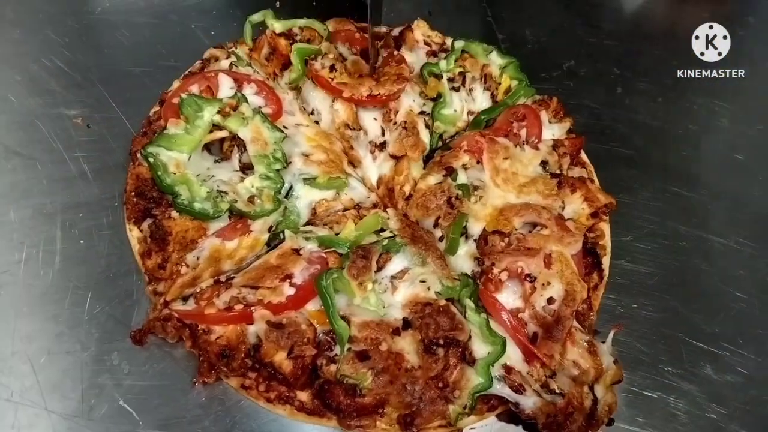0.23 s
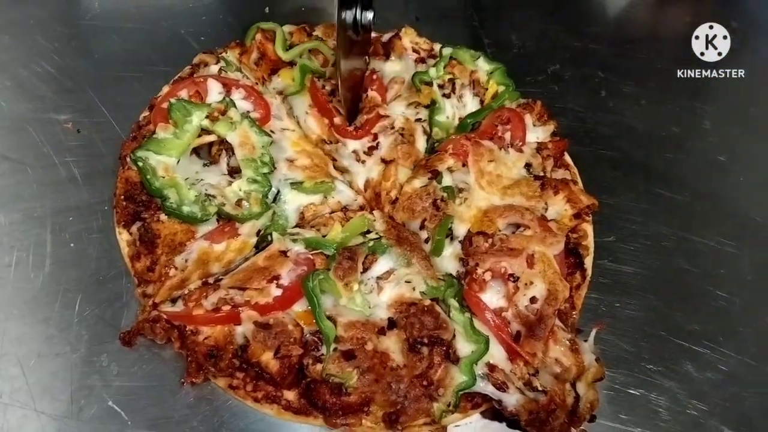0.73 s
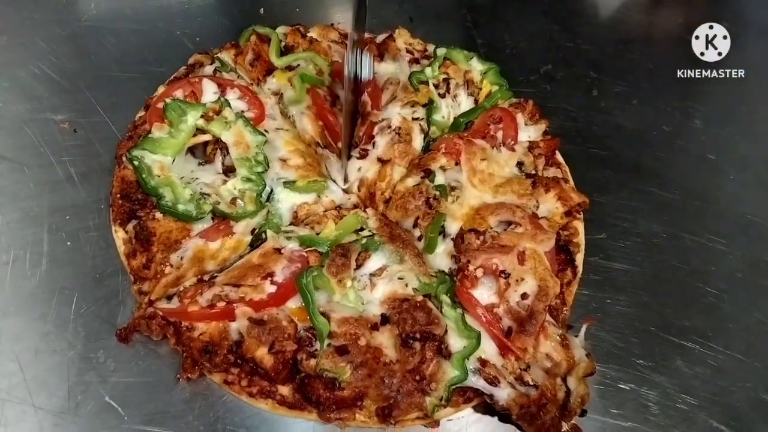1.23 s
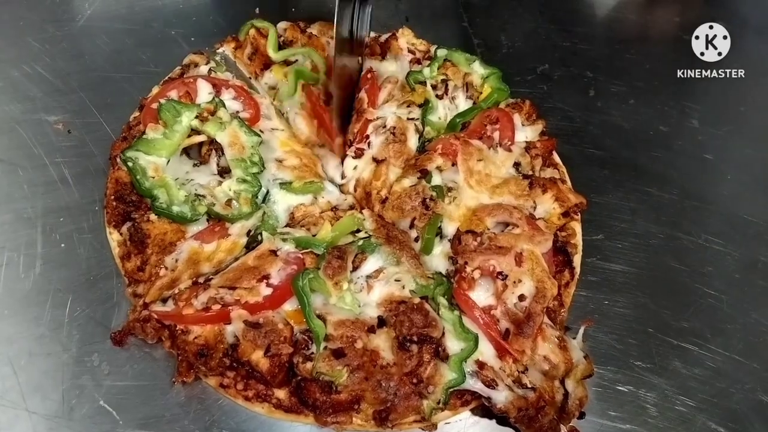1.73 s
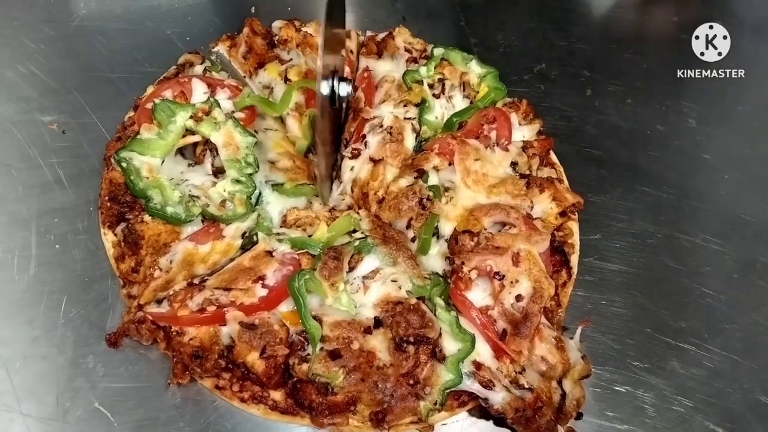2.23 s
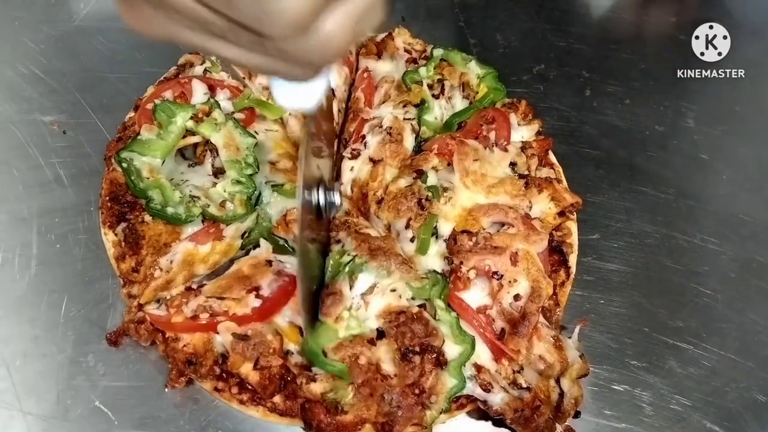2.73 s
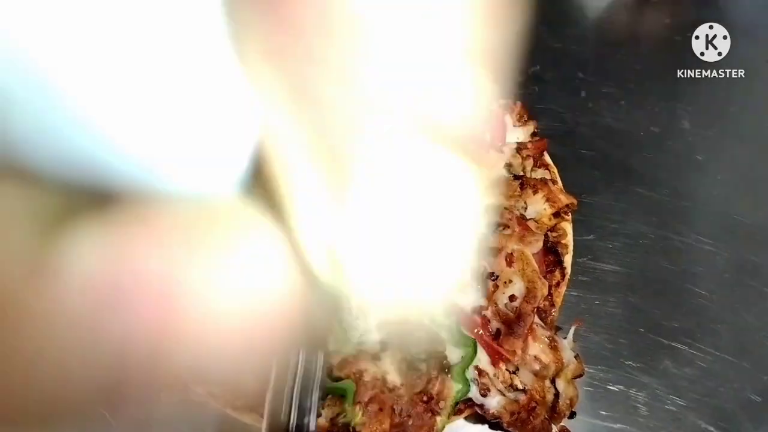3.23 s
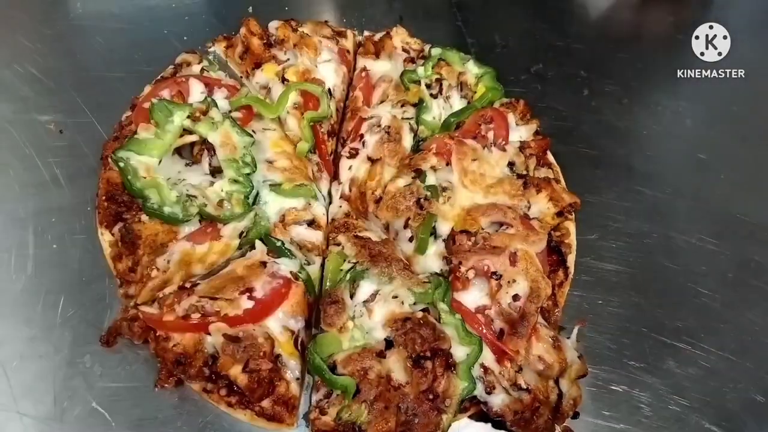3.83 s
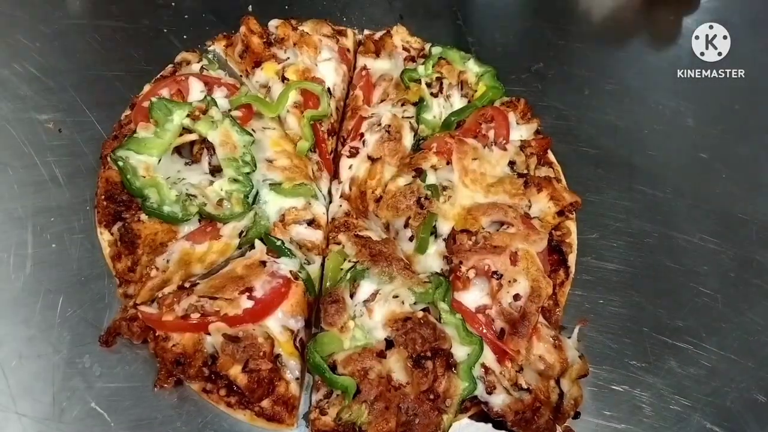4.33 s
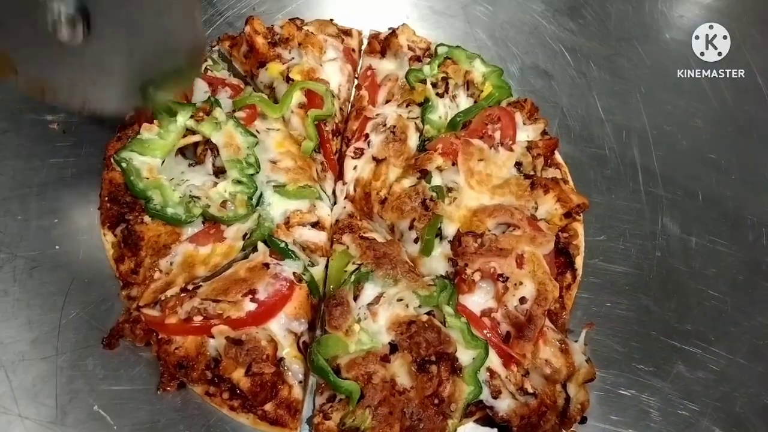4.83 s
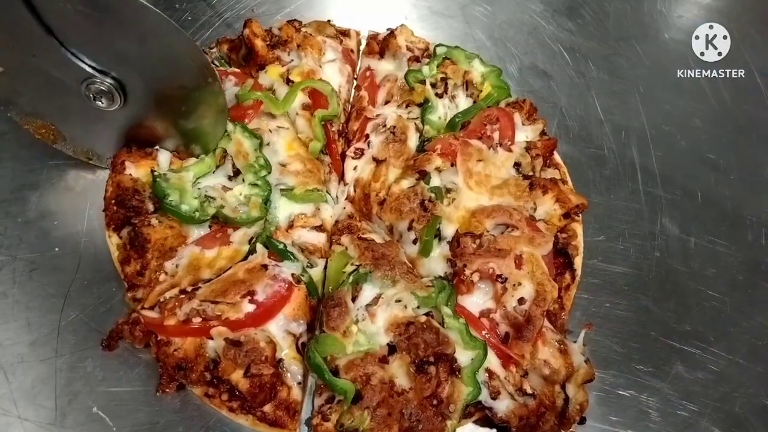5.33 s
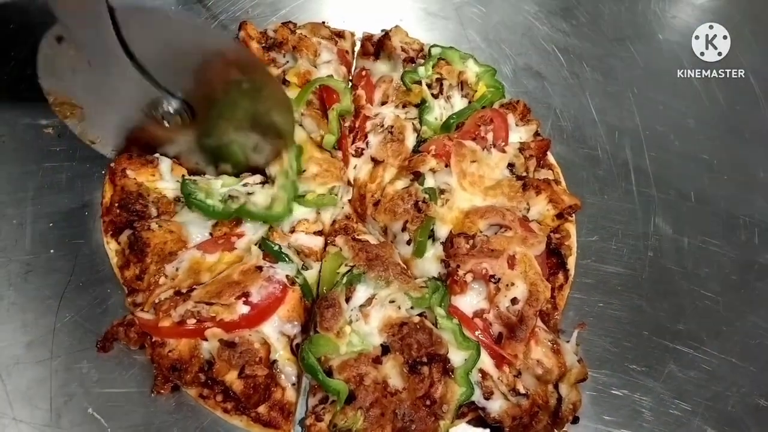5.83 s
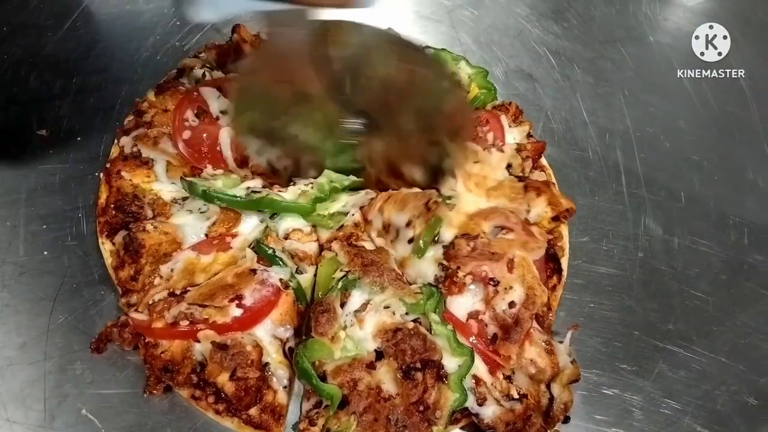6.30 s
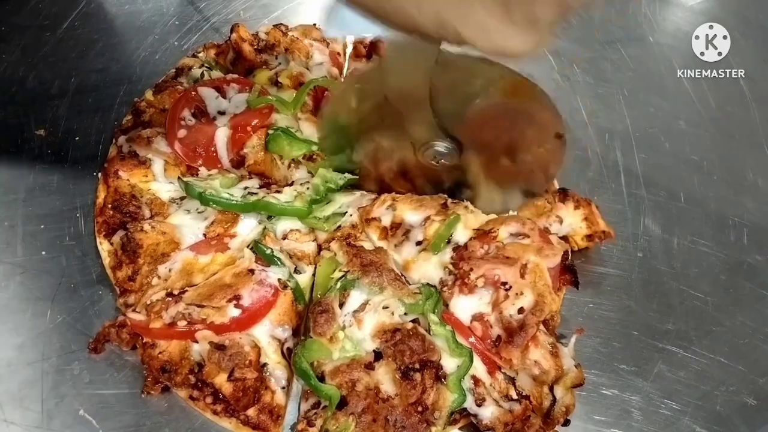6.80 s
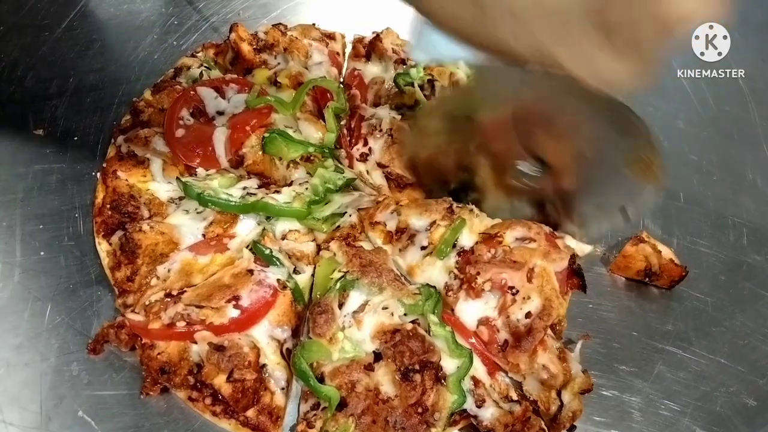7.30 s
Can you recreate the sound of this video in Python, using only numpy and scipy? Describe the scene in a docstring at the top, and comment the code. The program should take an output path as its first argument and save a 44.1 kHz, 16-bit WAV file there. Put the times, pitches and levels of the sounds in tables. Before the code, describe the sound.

Crackling crust, sharp snaps and dull metallic thuds as a pizza wheel is pushed across a steel counter, with hum fading midway.

```python
"""Hard-walled kitchen: a wheel cutter is pushed through a crisp pizza crust on a steel top.
Shaped noise grains make the thud, scrape and crackle of each push; short decaying tones make the snaps.
Blows into panel modes make the knocks, decaying sines the wheel's ring, narrow noise the short tones.
A soft hiss passes and a mains hum wavers below, with a rough low ring and a thin whine above it.
A phone's noise suppressor pulls down the kitchen air between the sounds."""
import sys
import numpy as np
from scipy import signal
from scipy.io import wavfile
from scipy.ndimage import uniform_filter1d

SR = 44100
rng = np.random.default_rng(int(sys.argv[2]) if len(sys.argv) > 2 else 0)


def persist_wave(psi):
    """Save psi, clipped to +-1, as 16-bit WAV."""
    counts = np.round(np.clip(psi, -1, 1) * 32767).astype(np.int16)
    wavfile.write(sys.argv[1], SR, np.atleast_2d(counts).T)


N = 333377
T = np.arange(N) / SR
HUM_HZ = 100.6

# dull colour of the steel top: [freq_hz, relative_db_per_hz]
THUD_SPECTRUM = [(30, -44.5), (60, -23.5), (90, -9.5), (125, -6.5), (160, -4.5), (200, -1.5), (450, -6),
                 (900, -13), (1200, -26), (2000, -91.5)]
# hard colour of wheel on steel: [freq_hz, relative_db_per_hz]
SCRAPE_SPECTRUM = [(350, -28.5), (600, -13.5), (1050, -2), (1430, -2), (1550, -3.5), (2270, -12.5),
                   (2480, -12), (5000, -27.5), (6500, -58), (11000, -120)]
# colour of breaking crust: [freq_hz, relative_db_per_hz]
CRUST_SPECTRUM = [(1470, -25), (2500, -13), (2940, -2.5), (3560, 1.5), (4480, -7), (5590, -3), (6320, -3.5),
                  (7420, -2.5), (10000, -8.5), (13800, -5.5), (15600, -14.5)]


def amp(db):
    """Decibels to amplitude."""
    return 10 ** (np.asarray(db) / 20)


def unit_rms(x):
    """Scale to RMS 1."""
    return x / np.sqrt(np.mean(x ** 2) + 1e-20)


def read(points, hz):
    """Interpolate a table over log frequency."""
    f, value = np.transpose(points)
    return np.interp(np.log(hz + 1), np.log(f + 1), value)


def curve(points):
    """Interpolate a (time, level) table over the whole scene."""
    time_s, level_db = np.transpose(points)
    return np.interp(T, time_s, level_db)


def add(mix, start_s, sound):
    """Add a sound into the mix in place, cut at the end."""
    part = mix[round(start_s * SR):][:len(sound)]
    part += sound[:len(part)]


def colour(x, spectrum):
    """Causal filter of unit energy: the phase follows from the log gain."""
    hz = abs(np.fft.fftfreq(4096, 1 / SR))
    log_gain = np.log(amp(np.maximum(read(spectrum, hz), -100)))
    min_phase = np.exp(np.conj(signal.hilbert(log_gain)))
    taps = np.fft.ifft(min_phase).real[:2048]
    return signal.oaconvolve(x, taps / np.linalg.norm(taps))[:len(x)]


def resonate(x, hz, width_hz):
    """One resonance of gain 1 at its centre: shift down, one-pole low-pass, shift back."""
    turn = np.exp(2j * np.pi * hz * np.arange(len(x)) / SR)
    r = np.exp(-np.pi * width_hz / SR)
    return 2 * (turn * signal.lfilter([1 - r], [1, -r], x / turn)).real


def grains(per_s, spread_db, noise_level):
    """Random clicks of very uneven size over continuous noise, at RMS 1."""
    size = amp(spread_db * np.minimum(rng.exponential(1, N), 4))
    signed = size * rng.choice([-1., 1.], N)
    clicks = unit_rms(signed * (rng.random(N) < per_s / SR))
    return unit_rms(clicks + noise_level * rng.standard_normal(N))


def patchy(x, depth_db):
    """Narrow bands swell and fade at random for some 50 ms, as a noise suppressor leaves them."""
    z = signal.stft(x, nperseg=512, noverlap=384)[2]
    patches = uniform_filter1d(rng.standard_normal(z.shape), size=3, axis=0)
    patches = uniform_filter1d(patches, size=16, axis=1)
    gain = amp(depth_db * unit_rms(patches))
    return signal.istft(z * gain, nperseg=512, noverlap=384)[1][:N]


def effort_db():
    """Each push swells, then dies away: thud, scrape and crackle levels, summed in power."""
    # pushes of the wheel into the crust; fall_s is for 30 dB at speed 1:
    # [start_s, swell_s, fall_s, thud_db, scrape_db, crackle_db]
    push_table = [(0.0, 0.003, .18, -50, -50, -63), (.21, .04, .25, -82, -69, -62),
                  (.52, .03, 0.5, -78, -68.5, -66), (.7, .025, 0.02, -75, -68, -85),
                  (.78, .05, 0.34, -58.5, -62, -62), (.955, .07, .12, -39, -42, -53),
                  (1.045, 0.013, .3, -44.5, -45, -42.5), (1.39, 0.066, .23, -37, -47.5, -52),
                  (1.62, .03, .5, -70, -70.5, -68), (1.7, .04, 0.35, -72, -72.5, -65),
                  (1.79, .02, 0.22, -72, -72, -62), (1.88, .008, 0.07, -63, -52, -58),
                  (2.245, .014, 0.65, -66.5, -72, -64), (2.3, .04, 0.2, -62, -70.5, -70),
                  (2.48, .02, 0.1, -70.5, -76, -69.5), (2.565, 0.013, 0.66, -53, -67.5, -63.5),
                  (2.6, 0.046, 0.1, -55, -58.5, -62.5), (2.665, 0.018, 0, -53.5, -55, -63),
                  (2.778, 0.0078, 0.1351, -37.5, -47.5, -50.5), (2.876, .022, .17, -28, -49, -40),
                  (2.92, 0.024, 0.3178, -36.5, -42.5, -57.5), (3.283, 0.011, 0.12, -51.5, -47.5, -56.5),
                  (3.31, .01, 0.28, -60, -60.5, -78), (3.93, 0.074, .6, -65, -71, -61),
                  (4.676, 0.018, 0.1152, -19.5, -24.5, -33.5), (4.71, .045, 0.3614, -27.5, -26.5, -30),
                  (5.23, .04, .5, -78, -69, -62.5), (5.33, .03, 0.54, -72, -74.5, -63),
                  (5.42, .06, 0.4, -70, -80, -72), (5.6, .035, 0.23, -85, -90, -63),
                  (5.88, .012, 0.43, -72.5, -72, -57.5), (5.9, .03, 0.22, -56, -68.5, -65.5),
                  (6.19, .015, 0.76, -68, -85, -65), (6.22, .045, 0.24, -61.5, -76, -57),
                  (6.42, .02, 0.14, -68, -85, -64), (6.526, .012, .2, -46, -59, -54),
                  (6.56, .04, 0.05, -52.5, -51.5, -54), (6.66, .03, 0.2, -65.5, -75.5, -62.5),
                  (6.785, .05, 0.19, -53.5, -44, -48.5), (6.85, 0.038, 0.14, -56.5, -55.5, -74),
                  (6.99, .055, 0.19, -44.5, -40.5, -43.5), (7.06, .04, 0.32, -49, -56, -66),
                  (7.25, .17, 0.3, -72.5, -58, -61)]
    onset_db = 24.5  # below the top, where a push sets in
    fall_speed = np.array([1.07, 0.96, 1.435])  # thud, scrape, crackle
    power, t = np.full((N, 3), 1e-12), T[:SR, None]
    for start_s, swell_s, fall_s, *top_db in push_table:
        rise_db = onset_db * (t / swell_s - 1)
        fall_db = -30 * fall_speed * (t - swell_s) / fall_s
        add(power, start_s, amp(2 * (top_db + np.minimum(rise_db, fall_db))))
    return 10 * np.log10(power.T)


def steel(body):
    """The panel modes of the steel top stand out of a broad colour."""
    # panel modes: [freq_hz, width_hz, gain_db]
    panel_modes = [(205, 30, 0), (287, 14, 2), (430, 16, 2), (608, 18, 2), (822, 20, -2), (1225, 35, -3),
                   (1420, 70, -5), (1900, 45, -3), (2290, 45, -3)]
    return body + sum(amp(db) * resonate(body, hz, width_hz) for hz, width_hz, db in panel_modes)


def rumble(thud_db, scrape_db):
    """Many small slips of the wheel shake the steel: a dull thud and a harder scrape."""
    thud = colour(grains(per_s=300, spread_db=1.5, noise_level=0.8), THUD_SPECTRUM)
    scrape = colour(grains(per_s=800, spread_db=7.0, noise_level=0.84), SCRAPE_SPECTRUM)
    return steel(patchy(amp(thud_db) * thud + amp(scrape_db) * scrape, depth_db=2.6))


def crackle(level_db):
    """Dense tiny fractures of the crust; harder pressure adds ever more of the finest sizzle."""
    # finest fractures: [freq_hz, relative_db_per_hz]
    sizzle_spectrum = [(8000, -39.5), (11000, -7.5), (12500, -2), (15600, 0)]
    small_snaps_per_s, small_snap_db = 41, 8  # chance snaps, size re crackle
    breaks = grains(per_s=1100, spread_db=3.5, noise_level=1.1)
    hits = rng.standard_normal(N) * (rng.random(N) < small_snaps_per_s / SR)
    burst = np.exp(-np.arange(200) / 30) * rng.standard_normal(200)
    small = signal.oaconvolve(amp(small_snap_db) * hits, burst)[:N]
    sizzle = amp(level_db - 4.5 + 0.48 * (level_db + 58.5)) * breaks
    body = colour(amp(level_db) * (breaks + small), CRUST_SPECTRUM)
    return patchy(body + colour(sizzle, sizzle_spectrum), depth_db=2.5)


def kitchen_air():
    """Steady noise of the room, strongest in the low mids."""
    # room air: [freq_hz, relative_db_per_hz]
    air_spectrum = [(20, -4.5), (60, -14), (150, -5.5), (300, 6), (600, -3), (1200, -7.5), (2000, -14.5),
                    (3200, -22), (4500, -24), (7500, -24), (11000, -22.5), (15600, -38)]
    return amp(-61.5) * colour(rng.standard_normal(N), air_spectrum)


def hum():
    """A steady mains line with weak noise around it, so that it wavers."""
    # line level, fading after the loud knock: [time_s, level_db]
    hum_level = [(0, -51), (4.7, -50.5), (5.1, -53), (5.2, -65.5), (7.56, -71.5)]
    # noise that fades with the hum: [freq_hz, relative_db_per_hz]
    hum_noise_spectrum = [(20, -26.5), (60, -18), (80, -4.5), (125, -2), (160, -4), (200, -26.5),
                          (400, -72.5)]
    line = np.sqrt(2) * np.sin(2 * np.pi * HUM_HZ * T)
    near = resonate(resonate(rng.standard_normal(N), HUM_HZ, 9), HUM_HZ, 9)
    noise = colour(rng.standard_normal(N), hum_noise_spectrum)
    return amp(curve(hum_level)) * (line + 0.3 * unit_rms(near) + 0.29 * noise)


def low_ring():
    """A rough tone near 300 Hz, like the tray ringing, comes and goes: a sine in narrow noise."""
    # sine peak level: [time_s, level_db]
    ring_level = [(0, -57), (.4, -69.5), (3.85, -70), (4.01, -53.5), (4.3, -65), (4.55, -67), (4.63, -57.5),
                  (5.42, -66.5), (5.48, -53.5), (5.6, -68), (6.1, -68), (6.16, -59.5), (6.5, -62),
                  (6.78, -62), (6.85, -53), (7.3, -49.5), (7.56, -56)]
    near = resonate(resonate(rng.standard_normal(N), 303, 40), 303, 40)
    tone = np.sin(6 * np.pi * HUM_HZ * T) + 0.75 * unit_rms(near)
    return amp(curve(ring_level)) * tone


def whine():
    """A thin high sine, switched on for three spans."""
    # whine spans: [start_s, end_s, peak_db]
    whine_spans = [(0, .9, -87), (1.93, 2.17, -80), (4.38, 4.68, -90)]
    whine_hz = 9044
    level = sum(amp(db) * (T > start_s) * (T < end_s) for start_s, end_s, db in whine_spans)
    return level * np.sin(2 * np.pi * whine_hz * T)


def short_tones():
    """Short narrow-band tones: noise in one narrow resonance, quick rise, slower fade."""
    # short tones: [start_s, pitch_hz, length_s, level_db]
    tone_table = [(0.241, 1465, 0.087, -62.5), (0.539, 1530, 0.12, -67.5), (0.717, 1020, .14, -64.5),
                  (.82, 475, .07, -61), (0.807, 1458, .12, -58.5), (1.793, 1402, .07, -62),
                  (1.89, 854, 0.031, -59), (1.901, 1647, .12, -63), (2.262, 1460, .2, -57.5),
                  (2.29, 800, .06, -63), (2.497, 711, .05, -58), (2.362, 980, .07, -63),
                  (2.612, 2310, .04, -57), (3.94, 1455, 0.14, -66), (3.95, 1784, .25, -70.5),
                  (3.99, 2290, .15, -69), (4.189, 977, .06, -66), (5.394, 1009, 0.069, -55.5),
                  (5.919, 1472, 0.17, -60), (5.962, 1054, .12, -60.5), (6.254, 570, 0.1, -52),
                  (6.389, 330, .08, -56), (7.17, 470, .08, -49)]
    out = np.zeros(N)
    for start_s, hz, length_s, db in tone_table:
        noise = rng.standard_normal(SR // 3)
        u = np.arange(round(length_s * SR)) / (length_s * SR)
        tone = unit_rms(resonate(resonate(noise, hz, 90), hz, 90))[-len(u):]
        add(out, start_s, amp(db) * tone * np.sin(np.pi * u ** 0.43))
    return out


def snaps():
    """A few cycles at the pitch of the flake that breaks, with a burst of fizz."""
    # single breaks of crust, and at 4.32 s a click as the hiss stops; fizz re snap: [start_s, peak_db,
    # pitch_hz, fizz_db]
    snap_table = [(0.2467, -46.5, 3770, -4), (0.5332, -42, 7870, -2.5), (0.835, -53, 3040, 8),
                  (1.0595, -35, 7080, 1), (1.0992, -31, 3050, -15.5), (1.4589, -35.5, 2636, -3),
                  (1.6407, -46, 7150, -2.5), (1.7584, -41.5, 7160, -9.5), (1.8886, -31.5, 2690, -47),
                  (2.2558, -46, 7270, -9.5), (2.3034, -51.5, 3420, 11), (2.6758, -33, 3480, -27),
                  (2.7861, -39.5, 2540, -18), (2.899, -32.5, 2693, -13), (2.9313, -19, 6880, -8),
                  (3.2907, -39, 3112, -20), (3.3048, -14, 2760, -23), (4.3194, -51.5, 3090, -8),
                  (4.5266, -52.5, 4083, -25.5), (4.6342, -37.5, 3370, -12.5), (4.7444, -18.5, 3375, -22),
                  (4.7526, -19, 5710, -2.5), (4.7726, -15, 2303, -20), (4.7932, -19, 3304, -1),
                  (5.2378, -48.5, 3120, 1.5), (5.3547, -41, 2980, -5.5), (5.4117, -39.5, 7140, -5),
                  (5.6487, -45, 7410, -12), (5.891, -46, 3850, -2.5), (6.2355, -39.5, 7800, -28),
                  (6.5363, -45, 7350, -14), (6.8324, -32, 3050, -5), (6.994, -49.5, 3300, -0.5),
                  (7.0154, -43, 3500, -1), (7.0474, -32, 3130, 0), (7.2679, -37, 3360, -8),
                  (7.3504, -43, 3310, -6.5), (7.3899, -39, 7230, -18.5), (7.424, -39, 5120, -10.5)]
    tones, fizz, t = np.zeros(N), np.zeros(N), np.arange(1300) / SR
    for start_s, db, hz, fizz_db in snap_table:
        u = t * hz / 1.3  # envelope peaks after 1.3 cycles
        add(tones, start_s, amp(db) * u * np.exp(1 - u) * np.sin(2 * np.pi * hz * t))
        decay = amp(db + fizz_db - 60 * t / 0.018)  # t60 18 ms
        add(fizz, start_s, decay * rng.standard_normal(len(t)))
    return tones + colour(fizz, CRUST_SPECTRUM)


def knocks():
    """A short push and rattle into the steel; a brighter blow has more of the hard colour."""
    # wheel drops through onto the steel, and at 4.32 s the click as the hiss stops; levels of the drive:
    # [start_s, level_db, brightness_db]
    knock_table = [(1.017, -29.5, -6), (1.411, -39, 6), (2.286, -40, -2.5), (2.572, -33.5, -35),
                   (2.785, -21, 3), (2.898, -13, -3.5), (2.93, -14, 5), (3.288, -43.5, 0.5),
                   (4.319, -46, 5), (4.683, -18, 2.5), (4.694, -4.5, 10.5), (5.92, -38, -3),
                   (6.261, -34, -12), (6.402, -48.5, -7.5), (6.787, -50, 10), (6.806, -40, 18),
                   (7.03, -37.5, 20.5), (7.171, -29, 7.5), (7.265, -39.5, 17.5), (7.312, -34, 11),
                   (7.348, -39, 18)]
    dull, hard, t = np.zeros(N), np.zeros(N), np.arange(900) / SR
    for start_s, db, bright_db in knock_table:
        rattle = 0.057 * rng.standard_normal(len(t)) * np.exp(-t / 0.0053)
        blow = rattle - (t == 0)
        add(dull, start_s, amp(db + 7.5) * blow)
        add(hard, start_s, amp(db + bright_db) * blow)
    return steel(colour(dull, THUD_SPECTRUM) + colour(hard, SCRAPE_SPECTRUM))


def hiss():
    """Smooth noise that swells in, holds and is cut off."""
    # soft even hiss: [freq_hz, relative_db_per_hz]
    hiss_spectrum = [(1200, -30), (2600, -12), (3600, -2), (6500, 0), (9000, -4), (12000, -12),
                     (15600, -13)]
    start_s, end_s, rise_s, level_db = 3.875, 4.322, 0.055, -64
    shape = np.clip((T - start_s) / rise_s, 0, 1) * (T < end_s)
    noise = colour(rng.standard_normal(N), hiss_spectrum)
    return amp(level_db) * shape * patchy(noise, depth_db=1.6)


def pings():
    """The thin wheel, rubbed at its edge, swells into its own modes."""
    # touches of the bare wheel, before a 1.5 dB cut: [start_s, level_db]
    ping_table = [(6.4443, -49), (7.1676, -37.5), (7.2679, -39), (7.3911, -35), (7.4226, -53.5)]
    # wheel modes: [freq_hz, relative_db, t60_s]
    wheel_modes = [(5120, -8, 0.14), (7074, -4, 0.13), (9300, -9.5, 0.148), (11580, -18, 0.14),
                   (13500, -5.5, 0.075), (14350, -8, 0.079)]
    out, t = np.zeros(N), np.arange(9000) / SR
    for start_s, level_db in ping_table:
        ring = np.zeros(len(t))
        for hz, db, t60_s in wheel_modes:
            share = rng.uniform(0.58, 1)
            ring += share * amp(db - 60 * t / t60_s) * np.sin(2 * np.pi * hz * t)
        swell = 1 - np.exp(-t / 0.012)
        add(out, start_s, amp(level_db - 1.5) * swell * ring / abs(ring).max())
    return out


def kitchen(x):
    """Hard walls: sparse echoes of random sign, each band dying at its own speed."""
    # reverberation: [freq_hz, t60_s]
    kitchen_t60 = [(100, 0.5), (400, 0.41), (1500, 0.42), (4000, 0.64), (8000, 0.6), (14000, 0.33)]
    taps = np.zeros(SR)
    at = np.arange(200, SR - 20, 20)
    taps[at + rng.integers(0, 20, len(at))] = rng.choice([-1., 1.], len(at))
    hz, t, z = signal.stft(taps, SR, nperseg=256)
    decay = amp(-60 * t / read(kitchen_t60, hz)[:, None])
    tail = signal.istft(z * decay, SR, nperseg=256)[1]
    return signal.fftconvolve(x, tail / np.linalg.norm(tail))[:N]


def scene():
    """Sum low and high sounds, their echoes and the background."""
    thud_db, scrape_db, crackle_db = effort_db()
    low = rumble(thud_db, scrape_db) + knocks()
    high = crackle(crackle_db) + short_tones() + snaps() + pings()
    echoes = kitchen(amp(0.5) * low + amp(-9) * high)
    background = kitchen_air() + hum() + low_ring() + whine() + hiss()
    return (low + high + echoes + background)[None]


def record(dry):
    """The suppressor lowers every band that stands little above its quiet level; then the band limit."""
    edge_hz, max_cut_db, bass_hz = 15800, 12, 160
    hz, _, z = signal.stft(dry[0], SR, nperseg=1024, noverlap=768)
    power = uniform_filter1d(abs(z) ** 2, size=3, axis=0)
    power = uniform_filter1d(power, size=5, axis=1) + 1e-20
    quiet = np.percentile(power, 15, axis=1, keepdims=True)
    floor = amp(-max_cut_db / (1 + (bass_hz / (hz + 1)) ** 6))[:, None]  # the bass passes
    gain = np.maximum(1 - 1.91 * quiet / power, floor)
    cleaned = signal.istft(z * gain, SR, nperseg=1024, noverlap=768)[1][:N]
    low_pass = signal.firwin(401, edge_hz, window=("kaiser", 8), fs=SR)
    return signal.oaconvolve(cleaned, low_pass, "same")[None]


dry = scene()
out = record(dry)
persist_wave(out)
```